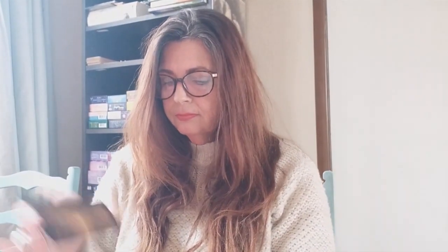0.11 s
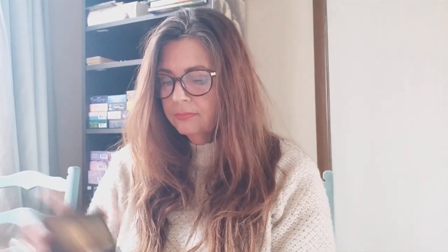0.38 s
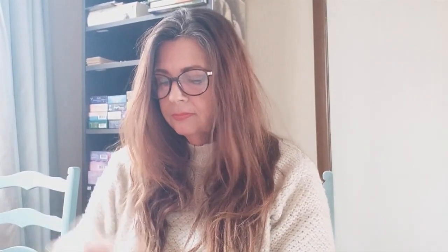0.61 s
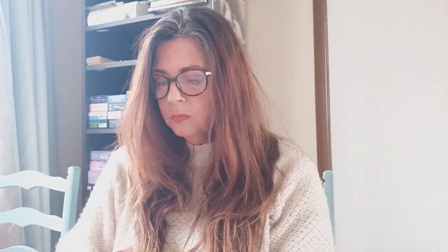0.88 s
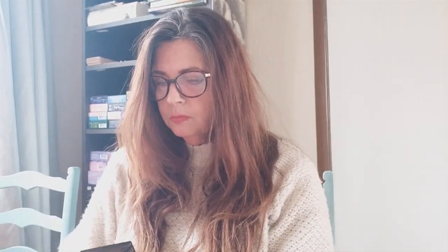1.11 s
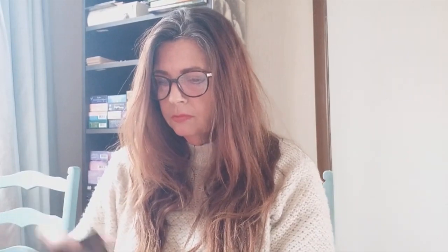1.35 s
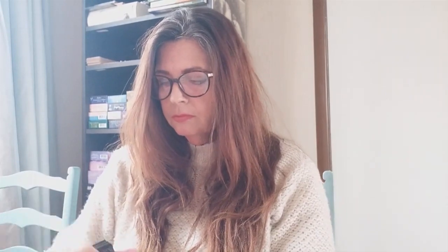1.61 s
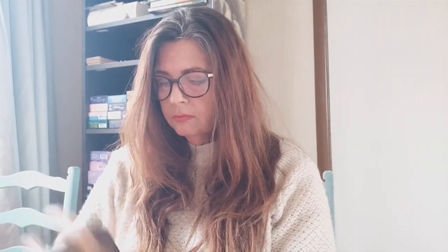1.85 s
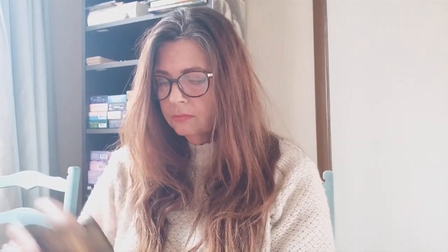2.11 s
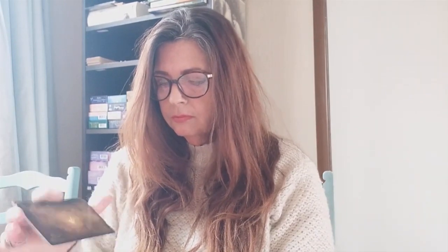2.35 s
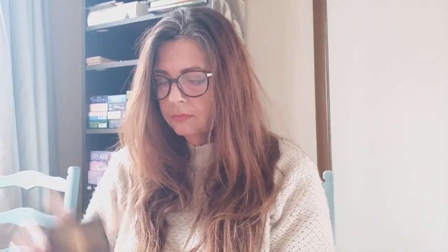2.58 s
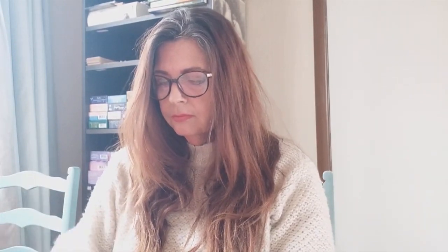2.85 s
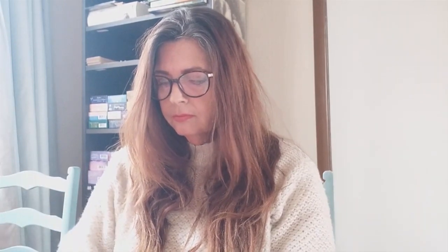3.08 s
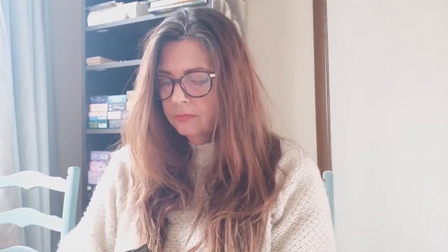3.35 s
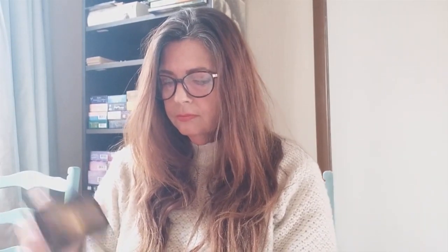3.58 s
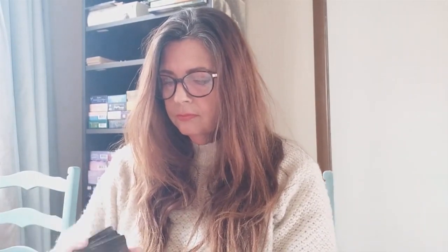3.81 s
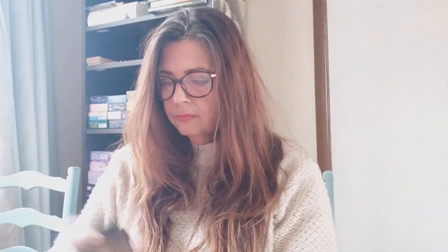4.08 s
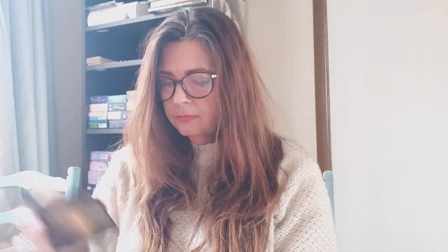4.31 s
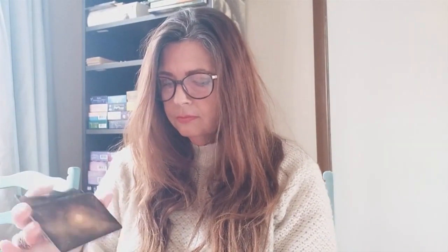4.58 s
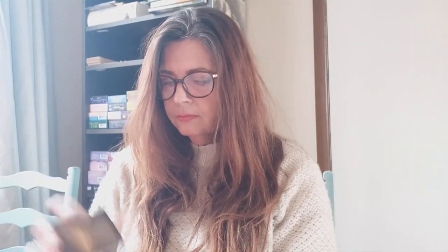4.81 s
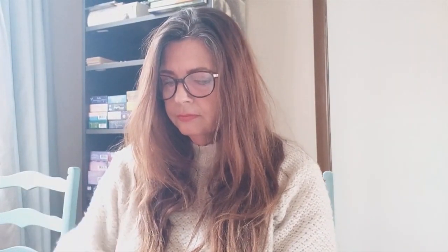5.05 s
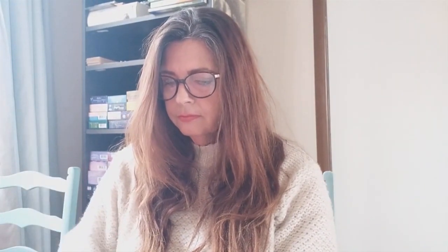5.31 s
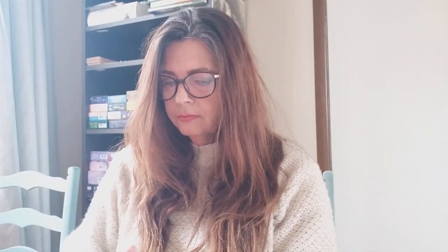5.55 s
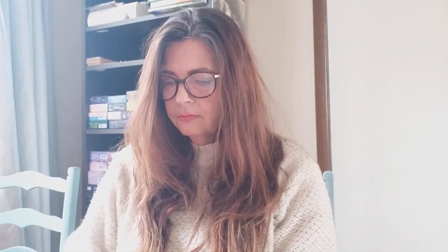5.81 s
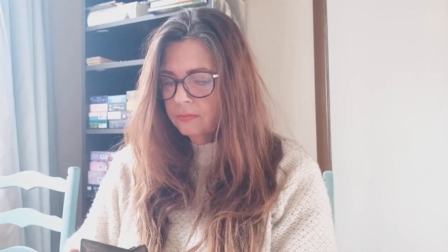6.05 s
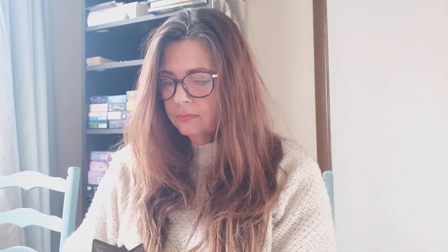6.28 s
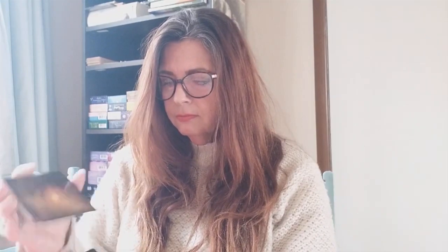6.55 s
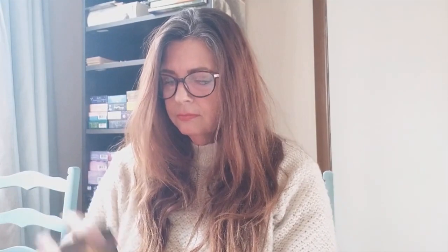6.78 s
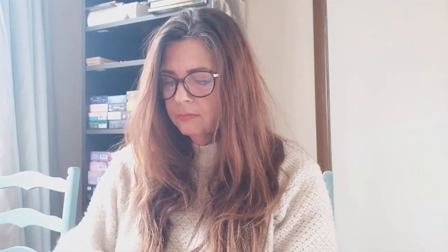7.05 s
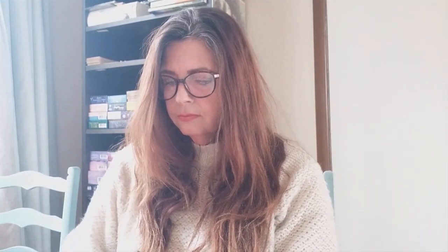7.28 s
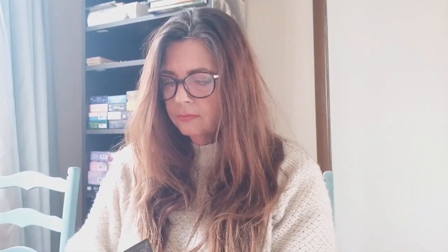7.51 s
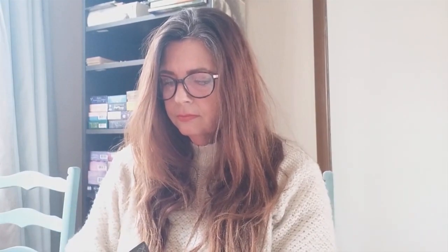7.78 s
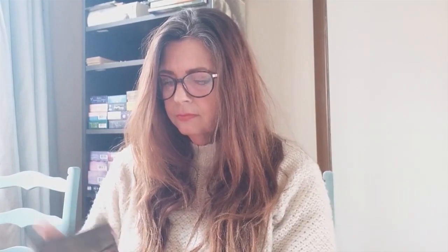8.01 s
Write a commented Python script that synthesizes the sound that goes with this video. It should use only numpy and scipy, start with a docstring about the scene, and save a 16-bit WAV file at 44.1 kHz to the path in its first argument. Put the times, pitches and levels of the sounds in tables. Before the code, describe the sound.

Hand shuffling of a card deck: papery swishes and sharp edge clacks in bursts, brief lulls, a few late strokes, over faint room hiss.

```python
"""Overhand card shuffle

Stiff glossy cards are shuffled overhand in a quiet room, an arm's length from a small two-port microphone.
Packets slap edge-on into the deck (filtered noise bursts) and slide along it with a gritty hiss (uneven
noise, resonances, ticks); the bent deck creaks now and then (runs of swelling sines, the sharpest as bursts).
Under it lie a low house rumble and microphone hiss (shaped noise) and a thin electronic whine (a sine)."""
import sys
import numpy as np
from scipy import signal
from scipy.fft import rfft, irfft, next_fast_len
from scipy.io import wavfile
from scipy.ndimage import uniform_filter1d

SR = 44100
rng = np.random.default_rng(int(sys.argv[2]) if len(sys.argv) > 2 else 0)


def unload_wav(signal):
    """Save mono or channel-first audio to the path in sys.argv[1] as 16-bit WAV at rate SR, clipped to [-1, 1]."""
    wavfile.write(
        sys.argv[1],
        SR,
        np.round(np.clip(np.atleast_2d(signal).T, -1, 1) * 32767).astype(np.int16),
    )


def ratio_of_db(decibels):
    """Turn decibels (scalar or array-like) into linear amplitude factors; 0 dB maps to 1."""
    return 10 ** (np.asarray(decibels, float) / 20)


N = 358974


def colour(x, points):
    """Shape x to a spectrum of (Hz, dB) points and bring it to rms 1."""
    hz, db = np.transpose(points)
    size = next_fast_len(len(x))
    bins_hz = np.maximum(np.arange(size // 2 + 1) * SR / size, 1)
    gain = ratio_of_db(np.interp(np.log(bins_hz), np.log(hz), db))
    y = irfft(rfft(x, size) * gain, size)[:len(x)]
    return y / np.std(y)


def ring(x, hz, width_hz):
    """Two-pole resonance, gain 1 at the centre."""
    return signal.lfilter(*signal.iirpeak(hz, hz / width_hz, fs=SR), x)


def ring_twice(x, hz, width_hz):
    """The same resonance passed twice, for steeper skirts."""
    return ring(ring(x, hz, width_hz), hz, width_hz)


def walk(rate_hz):
    """Random levels, a new one every 1 / rate_hz s, joined by linear slews."""
    hold = int(SR / rate_hz)
    return uniform_filter1d(np.repeat(rng.standard_normal(N // hold + 1), hold), hold)[:N]


def add(out, s, sound):
    """Mix a short sound in at time s."""
    start = int(s * SR)
    out[start:start + len(sound)] += sound[:N - start]


def rumble():
    """House rumble: shaped noise with a slowly wandering level, common to both ports."""
    # Each row: frequency in Hz, relative level in dB per Hz.
    rumble_spectrum = [(20, -18.5), (40, -15.5), (70, -9), (117, -3.5), (180, -10.5), (300, -18),
                       (600, -22.5), (1500, -27.5), (5000, -33.5), (12000, -32), (14000, -36.5),
                       (14700, -27.5), (16000, -22.5)]
    level_db = -72.5 + 1.0 * walk(3.7)
    return ratio_of_db(level_db) * colour(rng.standard_normal(N), rumble_spectrum)


def port_hiss():
    """Microphone hiss: steady shaped noise, independent in each port."""
    # Each row: frequency in Hz, relative level in dB per Hz.
    port_spectrum = [(60, 2), (300, -6), (1000, -6), (3000, -6), (8000, -4), (12000, -1.5), (14000, -17.5),
                     (17000, -17)]
    return np.array([ratio_of_db(-81) * colour(rng.standard_normal(N), port_spectrum) for _ in range(2)])


def whine():
    """Electronic whine: a sine with slight pitch and level wander over a faint noise skirt."""
    # Each row: mean frequency in Hz, level in dB before the wander.
    whine_tones = [(15574, -64.5)]
    hz, db = whine_tones[0]
    phase = 2 * np.pi * np.cumsum(hz + 3.1 * walk(7)) / SR
    tone = np.sqrt(2) * ratio_of_db(0.6 * walk(43)) * np.sin(phase)
    skirt = ring(rng.standard_normal(N), hz, 500)
    return ratio_of_db(db) * (tone + ratio_of_db(-19.5) * skirt / np.std(skirt))


def strokes():
    """Every slide and rustle as (s, dB, swell ms, fade ms, deck dB, ring Hz)."""
    # Cards sliding along the deck. Each row: time of fastest motion in s, hiss level in dB before the
    # layer shares, swell over 20 dB in ms (1 at least), deck over hiss in dB before the shares,
    # ring of the loose cards in Hz.
    slide_rows = [(0.022, -45.5, 10, -3, 1667), (0.14, -40.5, 35, -18.5, 4640), (0.333, -45, 26, -2, 4700),
                  (0.43, -45.5, 63.5, -17, 4760), (0.591, -40.5, 13, 0.5, 1710),
                  (0.682, -42.5, 43.5, -3.5, 1800), (0.735, -58, 20, 5.5, 397), (0.76, -64, 30.5, 5, 1650),
                  (0.785, -70.5, -1, -36.5, 4700), (0.893, -62.5, 5, -9, 2963), (1.441, -51, 22, -24, 3220),
                  (1.465, -56.5, 26, -2, 2750), (1.617, -63, 2, 4, 920), (1.65, -42, 28.5, 0, 3900),
                  (1.666, -57.5, 8, 9, 1035), (1.715, -47, 61, -7.5, 1550), (1.778, -49.5, 41, -2, 1472),
                  (1.914, -54, 11.5, -17, 1670), (1.932, -41, 11.5, -7, 1510), (1.957, -46, 5, 0, 1720),
                  (2.022, -44.5, 26.5, -8.5, 1782), (2.219, -45.5, 5, -6.5, 1406),
                  (2.311, -62, 25, -41.5, 3740), (2.519, -47, 6, 0.5, 1400), (2.612, -40, 29.5, -29, 4300),
                  (2.824, -45, 6, 0.5, 3900), (2.856, -44, 30, -2, 3530), (3.563, -67.5, 91, -2, 1840),
                  (3.616, -56.5, 22, -8, 3045), (3.645, -68.5, 13.5, -23.5, 2840),
                  (3.847, -42.5, 5, 7.5, 1746), (3.919, -48, 66.5, 2.5, 1600),
                  (3.96, -47, 37.5, -5.5, 3780), (4.148, -46.5, 22, -6, 1468), (4.159, -45.5, 0.5, 3, 1426),
                  (4.288, -51, 24.5, -14, 5195), (4.44, -33.5, 16.5, 7, 1517),
                  (4.526, -54.5, 26.5, 12.5, 1360), (4.605, -57.5, 72, 0.5, 1790),
                  (4.757, -51, 20, -8, 1460), (4.767, -44.5, 8.5, -4, 1550),
                  (4.833, -47.5, 13.5, -12, 4560), (4.862, -47.5, 40, -3, 1654),
                  (5.057, -47.5, 29.5, -4.5, 4820), (5.163, -47.5, 80, -18, 4930),
                  (5.375, -54, 60, -20.5, 4743), (6.551, -52.5, 25.5, -9.5, 3365),
                  (6.71, -68.5, 6, -8.5, 1006), (6.772, -37.5, 28, -1, 1140), (6.847, -50, 48.5, -10, 1303),
                  (7.04, -46.5, 14.5, -8.5, 3930), (7.105, -63, 80.5, -8.5, 4610),
                  (8.128, -55, 40, -25, 5030)]
    # Faint slow rustles between the runs, probably hands regripping the deck.
    # Each row: loudest time in s, hiss level in dB before the layer shares.
    rustle_rows = [(1.04, -78), (1.21, -82), (1.393, -66.5), (3.11, -79.5), (3.22, -74.5), (5.858, -81),
                   (6.041, -76.5), (6.485, -73), (7.434, -76), (7.625, -76), (7.869, -77), (8.003, -69)]
    fade_ms, settle_ms, sudden_ms = 135.4, 85.6, 9.5
    rows = []
    for s, db, swell_ms, deck_db, hz in slide_rows:
        # a packet that lands suddenly keeps settling for longer
        settling_ms = settle_ms * np.exp(-(swell_ms / sudden_ms) ** 2)
        rows.append((s, db, swell_ms, fade_ms + settling_ms, deck_db, hz))
    for s, db in rustle_rows:
        rows.append((s, db, 123, 370, -7.5, None))
    return rows


def grit(scatter_db, patchy_db, rate_hz):
    """Friction: noise whose samples are unevenly strong and come in patches."""
    noise = rng.standard_normal(N)
    return noise * ratio_of_db(scatter_db * rng.exponential(size=N) + patchy_db * walk(rate_hz))


def rub_hiss():
    """Sliding hiss of the card faces, split into low, middle and high bands."""
    # Each row: frequency in Hz, relative level in dB per Hz.
    hiss_spectrum = [(1500, -20), (3000, -5), (4500, -0.5), (7000, -1), (10000, 0), (13000, 0.5),
                     (15000, -5), (17000, -28)]
    # Band edges. Each entry: frequency in Hz.
    split_hz = [5600, 9100]
    hiss = colour(grit(scatter_db=3.0, patchy_db=1.5, rate_hz=360), hiss_spectrum)
    low, below_high = (signal.sosfiltfilt(signal.butter(2, hz, fs=SR, output="sos"), hiss)
                       for hz in split_hz)
    return low, below_high - low, hiss - below_high


def deck_body(rub):
    """The held deck resonates to the rubbing; its modes alternate in sign."""
    # Each row: frequency in Hz, width of each filter pass in Hz, relative level in dB.
    deck_modes = [(620, 780, -6), (980, 1300, -3), (1550, 432, 0.5), (1901, 716, 0.5), (2890, 2400, -4.5),
                  (3900, 2300, -3)]
    body = sum((-1) ** k * ratio_of_db(db) * ring_twice(rub, hz, width_hz)
               for k, (hz, width_hz, db) in enumerate(deck_modes))
    return body / np.std(body)


def ticks(per_s, spread_db):
    """Single card edges catching: noise bursts of about a millisecond, uneven in size."""
    sizes = ratio_of_db(spread_db * np.minimum(rng.exponential(size=N), 2.5))
    catches = (rng.random(N) < per_s / SR) * sizes
    decay = np.exp(-1 / (0.00091 * SR))
    bursts = signal.lfilter([1], [1, -decay], catches) * rng.standard_normal(N)
    bursts = ring(bursts, 4500, 9000)
    return bursts / np.std(bursts)


def slides():
    """Card faces rub: a bright hiss, the body of the deck, catching edges and the ring of the loose packet."""
    low, middle, high = rub_hiss()
    rub = grit(scatter_db=2.2, patchy_db=3.0, rate_hz=150)
    layers = np.array([low, middle, high, deck_body(rub), ticks(per_s=100, spread_db=-0.5)])
    # fade-time factors: the furnishings soak up the treble first; edges catch only while the cards still move
    linger = np.array([[1.15], [0.95], [0.8], [1.25], [0.7]])
    # a stroke that loads the deck is duller and catches more; a glancing one is airy and smooth
    follows_deck = np.array([[0.15], [-0.05], [-0.2], [1], [0.9]])
    share_db = np.array([[1.5], [0.1], [-1.5], [-3.0], [-10.0]])
    power, packet, time = np.zeros((5, N)), np.zeros(N), np.arange(N) / SR
    for s, db, swell_ms, fade_ms, deck_db, hz in strokes():
        swell_s, fade_s = max(swell_ms, 1) / 1000, fade_ms / 1000
        near = slice(max(int((s - 2 * swell_s) * SR), 0), int((s + fade_s) * SR))
        late = time[near] - s
        swell_db = -20 * np.abs(late / swell_s) ** 1.71
        # exponent over 1: the fade quickens as the cards come to rest
        fade_db = -60 * np.abs(late / (linger * fade_s)) ** 1.134
        shape_db = np.where(late < 0, swell_db, fade_db)
        gain = ratio_of_db(db + share_db + follows_deck * deck_db + shape_db)
        power[:, near] += gain ** 2
        if hz is None:  # no loose packet
            continue
        tone = ring_twice(rub[near], hz, 0.14 * hz)
        # thin high-ringing packets are clearer: 3.5 dB per octave about 1.5 kHz
        packet_db = -10 + 3.5 * np.log2(hz / 1500) - 0.61 * deck_db
        packet[near] += ratio_of_db(packet_db) * gain[3] * tone / np.std(tone)
    return np.sum(np.sqrt(power) * layers, axis=0) + packet


def slaps_and_sharp_creaks():
    """Each slap or sharp creak is a few cycles of ring, a crisp crack and a loose low thump."""
    # Card edges striking, and near 7.95 s the sharpest creaks of the bent deck.
    # Each row: start in s, peak of the ring in dB, ring in Hz, thump under ring in dB.
    burst_rows = [(0.0208, -31, 2117, -23), (0.152, -42.5, 1974, -18), (0.297, -50, 12400, -43),
                  (0.3147, -34.5, 6610, -32), (0.334, -26, 4420, -33.5), (0.451, -39.5, 4110, -11.5),
                  (0.5346, -52.5, 11400, -18.5), (0.5804, -28, 1880, -35.5), (0.5929, -29.5, 4740, -13.5),
                  (0.6165, -29.5, 1940, -22), (0.6634, -33.5, 3410, -46), (0.6941, -24, 1774, -13.5),
                  (0.8808, -38.5, 12000, -24.5), (1.0293, -62.5, 1790, -5), (1.36, -57, 3980, -32),
                  (1.4376, -42, 3500, -30), (1.4642, -42.5, 2720, -28), (1.6149, -44.5, 935, -36.5),
                  (1.631, -31, 7710, -42.5), (1.6422, -21, 4396, -85), (1.654, -27.5, 4180, -38),
                  (1.707, -45, 1560, -40), (1.765, -49, 1370, -32), (1.7927, -40.5, 4070, -42.5),
                  (1.906, -46.5, 1980, -13), (1.9305, -33.5, 1410, -23), (1.957, -26.5, 2500, -32),
                  (2.0123, -37, 2050, -35), (2.2173, -34.5, 2610, -22), (2.2294, -41, 2510, -33.5),
                  (2.5157, -42, 2330, -20), (2.525, -44, 1470, -19), (2.6022, -31, 9700, -38),
                  (2.821, -49, 2100, -16), (2.8524, -25.5, 3760, -27.5), (3.608, -43, 9840, -19.5),
                  (3.8377, -34.5, 1750, -33), (3.8487, -22, 1830, -23), (3.8526, -24, 2070, -31),
                  (3.883, -31.5, 2100, -12), (3.89, -41.5, 6000, -15), (3.9069, -35, 6000, -18),
                  (3.963, -31, 3830, -23.5), (4.1252, -49, 10100, -12), (4.158, -22.5, 1636, -39),
                  (4.391, -51.5, 2500, -5), (4.284, -52.5, 6050, -39), (4.4256, -20.5, 5570, -32),
                  (4.4323, -15.5, 1950, -32), (4.4435, -19, 3500, -27.5), (4.747, -42.5, 7340, -7.5),
                  (4.7672, -43.5, 1540, -4), (4.83, -38, 3240, -45), (4.8495, -34.5, 4260, -22),
                  (4.8697, -29.5, 2704, -23.5), (5.0445, -29, 12800, -53), (5.0587, -41, 5000, -48),
                  (5.485, -48.5, 12100, -33.5), (6.5446, -51, 3220, -35.5), (6.747, -41.5, 1446, -39.5),
                  (6.758, -29, 11000, -26), (6.7681, -33, 1970, -25), (7.0313, -40, 8670, -20),
                  (7.923, -51, 2060, -23), (7.9487, -50, 2118, -26), (7.9778, -56, 2040, -33)]
    out, time = np.zeros(N), np.arange(4096) / SR
    chance = rng.standard_normal((len(burst_rows), 4096))
    for (s, db, hz, thump_db), noise in zip(burst_rows, chance):
        tone = ring(noise * np.exp(-time / 0.0016), hz, 0.27 * hz)
        crack = np.diff(noise, prepend=0) * np.exp(-time / 0.00069)
        # in a slap, the palm
        thump = ring(ring(noise * np.exp(-time / 0.0098), 420, 750), 330, 960)
        burst = tone / np.abs(tone).max()
        burst += ratio_of_db(-21.5) * crack / np.abs(crack).max()
        burst += ratio_of_db(thump_db) * thump / np.abs(thump).max()
        add(out, s, ratio_of_db(db) * burst)
    return out


def room(x):
    """Dense short reflections of a small furnished room, duller with time."""
    t60_s, level_db = 0.24, -12.5
    time = np.arange(SR // 2) / SR
    noise = rng.standard_normal((2, len(time)))
    dull = ring(noise[0], 1100, 3500) * ratio_of_db(-60 * time / t60_s)
    bright = 0.26 * noise[1] * ratio_of_db(-60 * time / (0.95 * t60_s))
    tail = (dull + bright) * (time > 0.004)
    return ratio_of_db(level_db) * signal.fftconvolve(x, tail / np.linalg.norm(tail))[:N]


def table_ring(x):
    """Narrow rings that the cards leave hanging, probably the table top."""
    # Each row: frequency in Hz, width in Hz, gain in dB.
    table_modes = [(1526, 9, 3.0), (1410, 18, -4.5)]
    return sum(ratio_of_db(db) * ring(x, hz, width_hz) for hz, width_hz, db in table_modes)


def bumps():
    """The heaviest strokes shake the table under the microphone: a low mode swells softly and dies away."""
    # Each row: start in s, level in dB before the swell and decay, frequency in Hz.
    bump_rows = [(0.16, -68.5, 101.2), (0.692, -59, 95.9), (2.835, -58.5, 119.7), (3.838, -71.5, 140),
                 (4.432, -51.5, 113.5), (5.047, -58.5, 118)]
    out, time = np.zeros(N), np.arange(SR // 4) / SR
    for s, db, hz in bump_rows:
        envelope = ratio_of_db(db - 60 * time / 0.25) * (1 - np.exp(-time / 0.0037))
        add(out, s, envelope * np.sin(2 * np.pi * hz * time))
    return out


def creaks():
    """Soft slips swell into one narrow deck mode; the run is strongest in its middle."""
    # The bent deck creaks in runs of uneven slips. Each row: start in s, length in s,
    # level in dB before slip scatter and swell, first frequency in Hz, last frequency in Hz (before detuning).
    creak_rows = [(3.52, 0.064, -52, 1840, 1920), (3.552, 0.0324, -58, 2323, 2800),
                  (4.402, .022, -37, 1820, 1850), (7.918, 0.1, -48.5, 2130, 2030)]
    gap_s, scatter_db, detune = 0.011, 3.5, 0.031
    out, time = np.zeros(N), np.arange(1024) / SR
    swell = time / 0.0026 * np.exp(1 - time / 0.001528)
    for s, length_s, db, first_hz, last_hz in creak_rows:
        gap, size, tune = rng.standard_normal((3, 24))
        late = np.cumsum(gap_s * np.exp(0.34 * gap))
        for k in np.flatnonzero(late < length_s):
            progress = late[k] / length_s
            gain = ratio_of_db(db + scatter_db * size[k]) * np.sin(np.pi * progress)
            hz = (first_hz + (last_hz - first_hz) * progress) * (1 + detune * tune[k])
            add(out, s + late[k], gain * swell * np.sin(2 * np.pi * hz * time))
    return out


def two_ports(cards):
    """Some bands are stronger in one port: a filtered share is added left and subtracted right."""
    # Each row: frequency in Hz, width of each filter pass in Hz, share as a ratio (positive favours left).
    tilt_bands = [(1850, 1250, .22), (10000, 2000, -.2)]
    side = sum(share * ring_twice(cards, hz, width_hz) for hz, width_hz, share in tilt_bands)
    return np.array([cards + side, cards - side])


def scene():
    """Cards in the room, heard a little differently by the two ports, over the steady background."""
    background = rumble() + whine() + port_hiss()
    dry = slides() + slaps_and_sharp_creaks() + creaks()
    cards = dry + room(dry) + table_ring(dry) + bumps()
    return two_ports(cards) + background


def band_limit(x):
    """A steep low-pass at the top of the band."""
    return signal.sosfilt(signal.butter(12, 17000, fs=SR, output="sos"), x)


def record(dry):
    """The recorder cuts the top steeply above 15.74 kHz."""
    low_pass = signal.ellip(12, 0.2, 45, 15740, fs=SR, output="sos")
    cut = signal.sosfilt(low_pass, dry)
    return band_limit(cut)


dry = scene()
out = record(dry)
unload_wav(out)
```